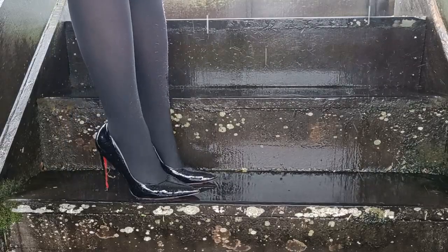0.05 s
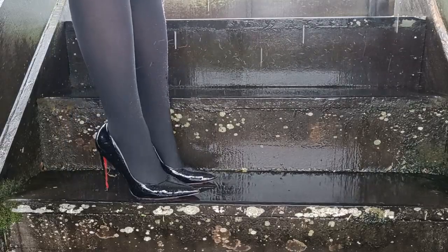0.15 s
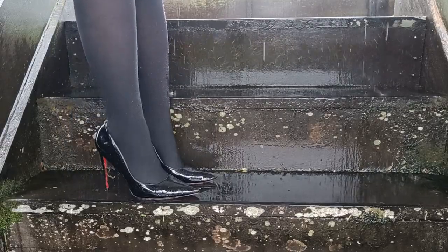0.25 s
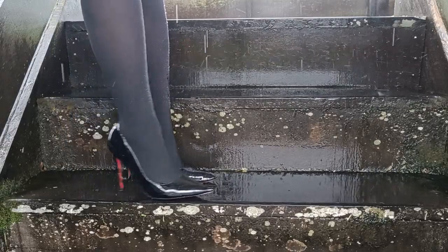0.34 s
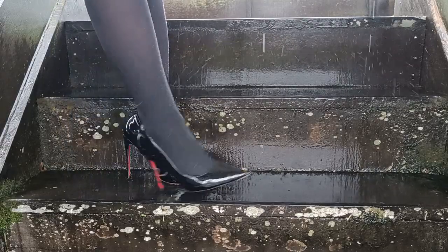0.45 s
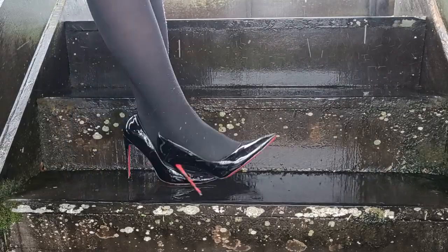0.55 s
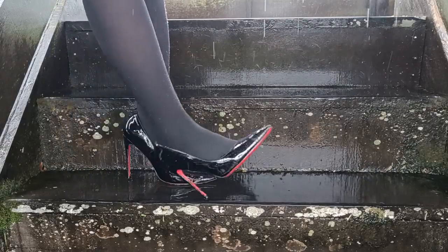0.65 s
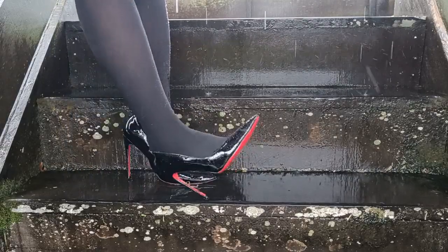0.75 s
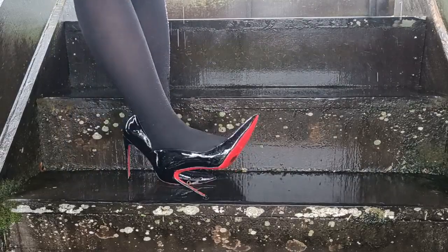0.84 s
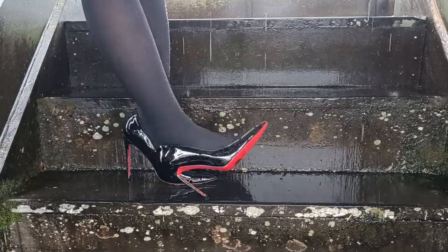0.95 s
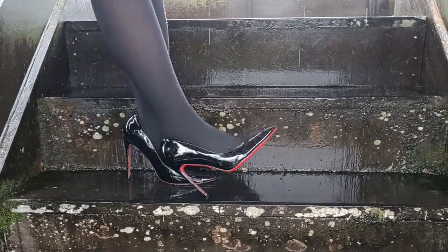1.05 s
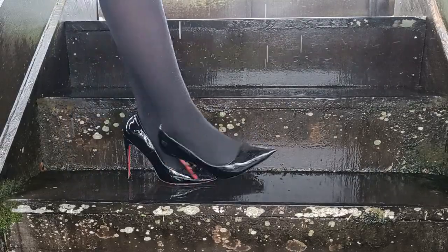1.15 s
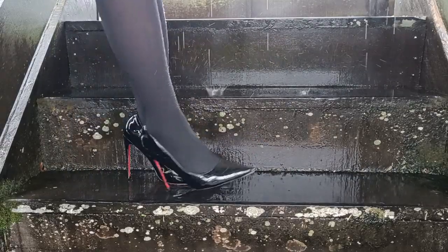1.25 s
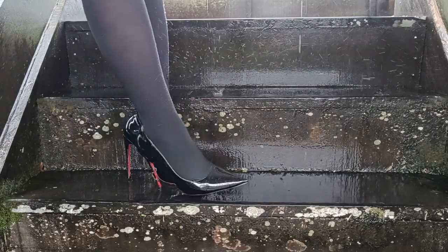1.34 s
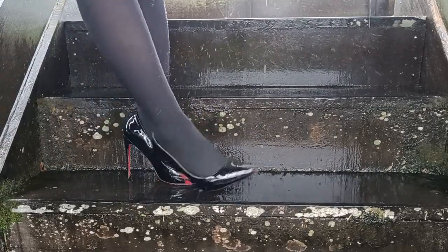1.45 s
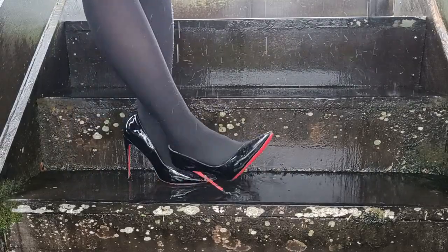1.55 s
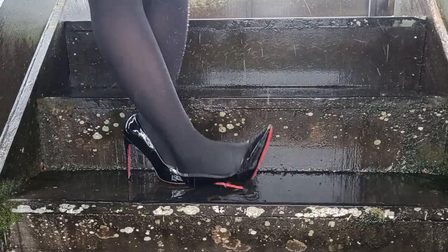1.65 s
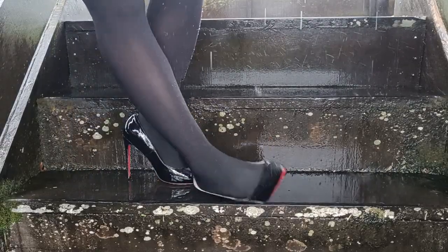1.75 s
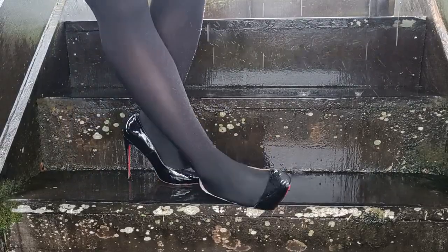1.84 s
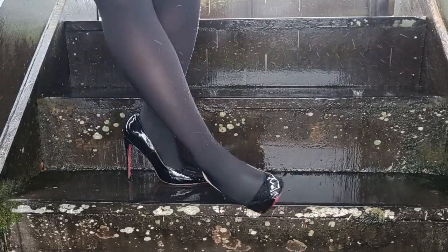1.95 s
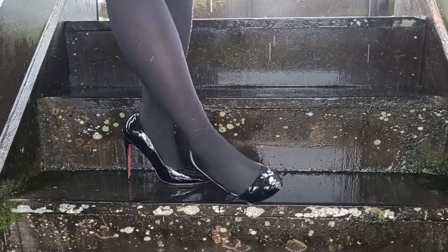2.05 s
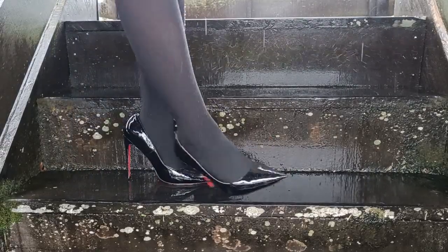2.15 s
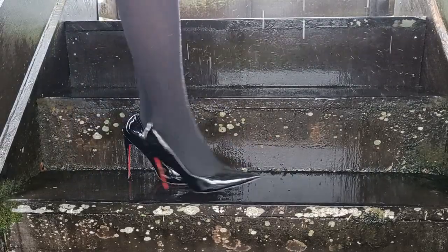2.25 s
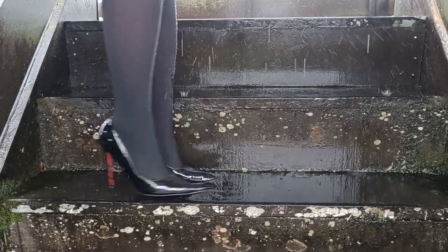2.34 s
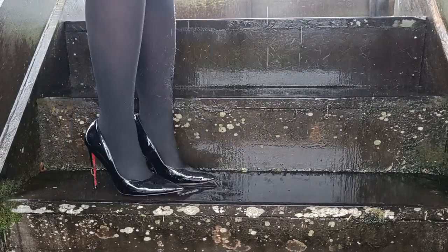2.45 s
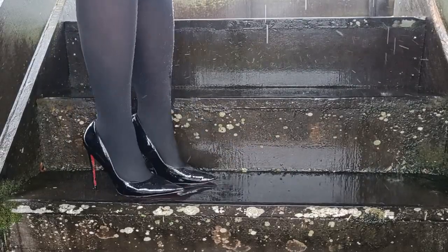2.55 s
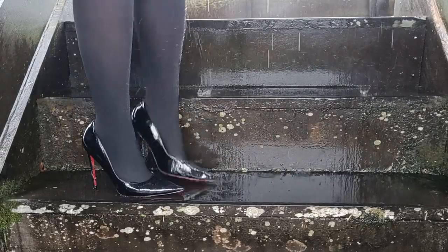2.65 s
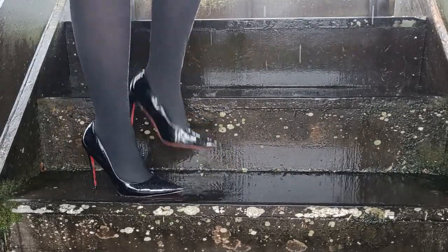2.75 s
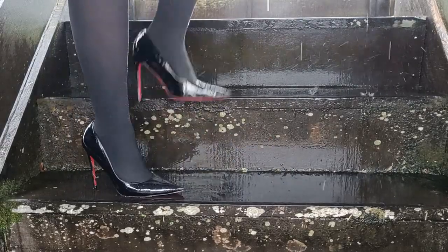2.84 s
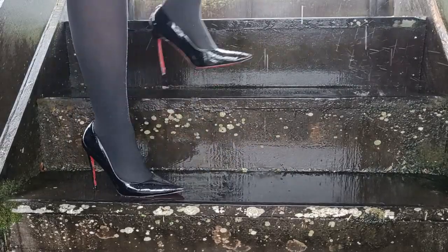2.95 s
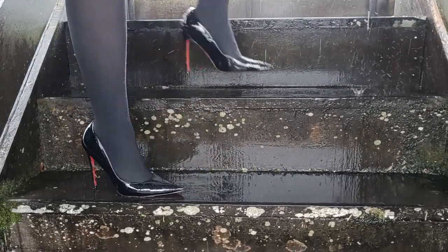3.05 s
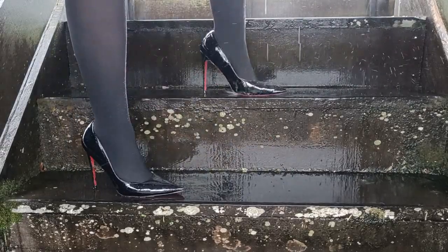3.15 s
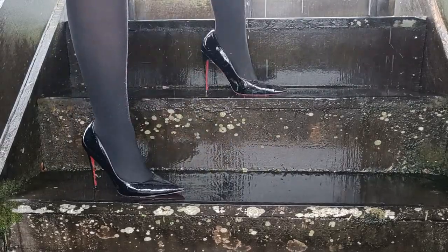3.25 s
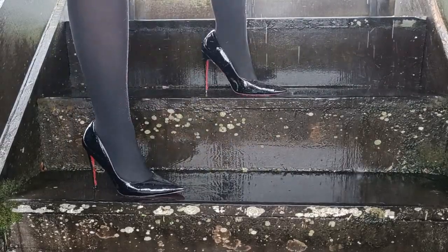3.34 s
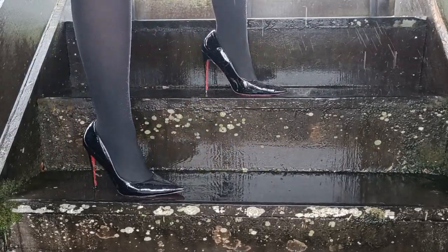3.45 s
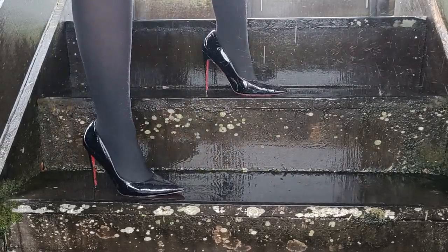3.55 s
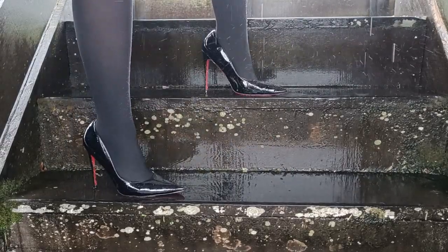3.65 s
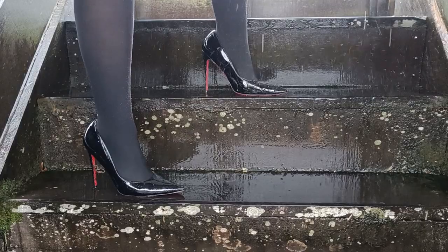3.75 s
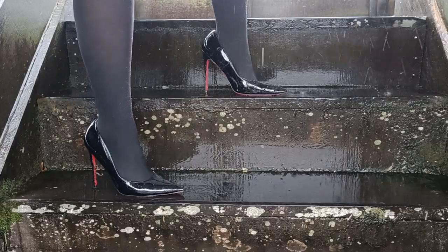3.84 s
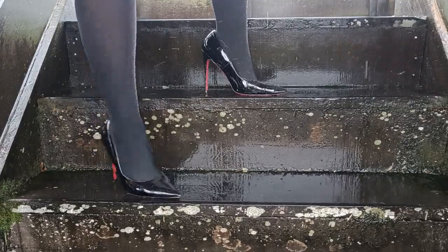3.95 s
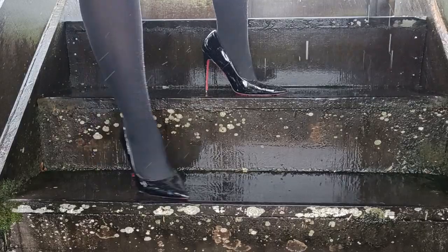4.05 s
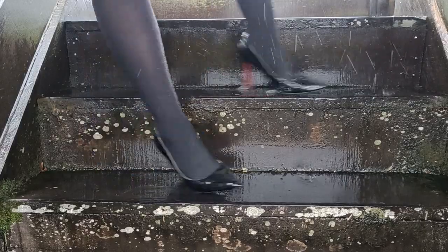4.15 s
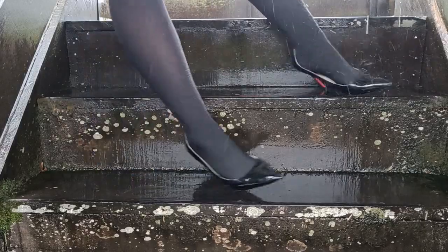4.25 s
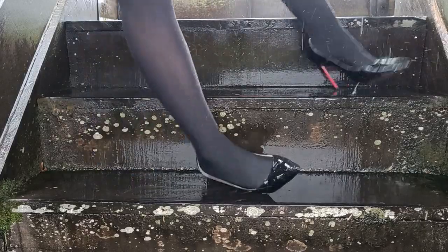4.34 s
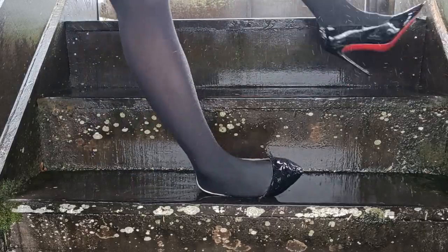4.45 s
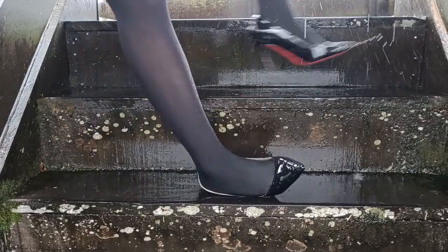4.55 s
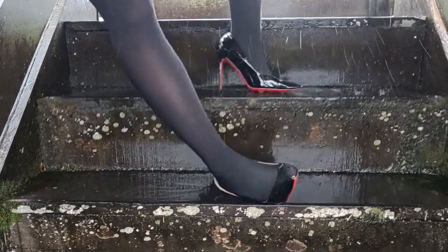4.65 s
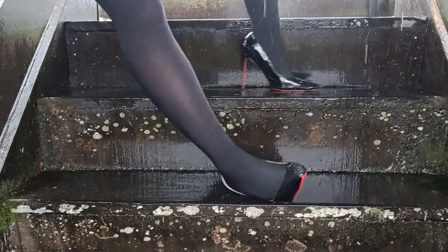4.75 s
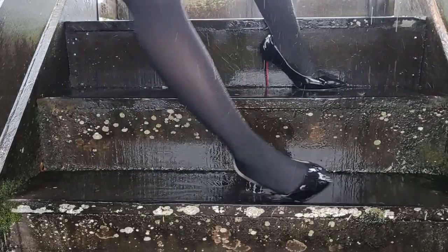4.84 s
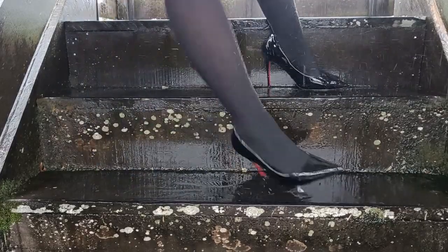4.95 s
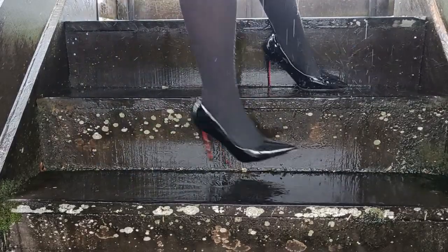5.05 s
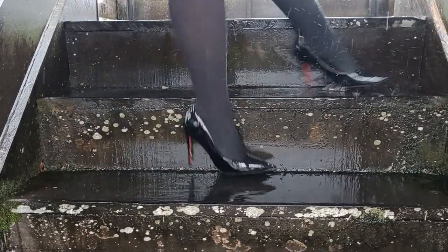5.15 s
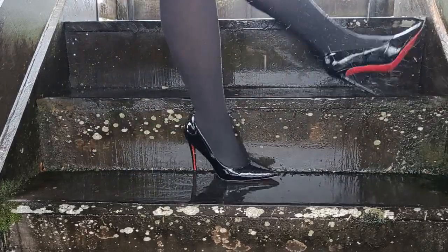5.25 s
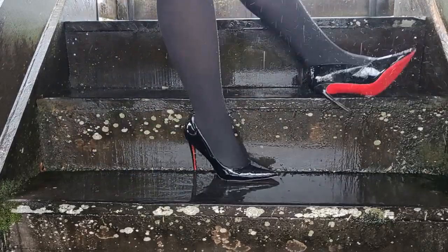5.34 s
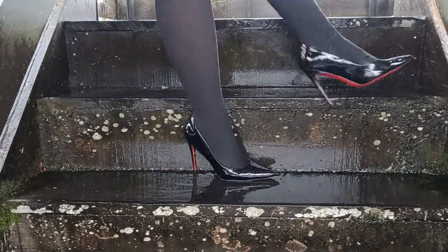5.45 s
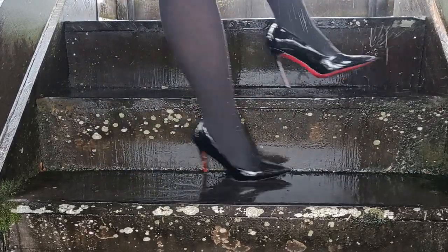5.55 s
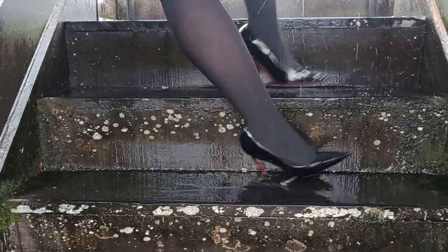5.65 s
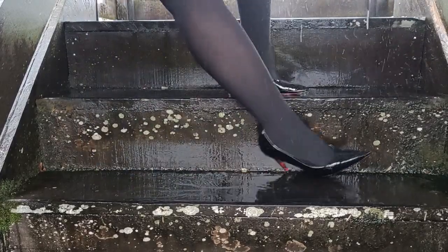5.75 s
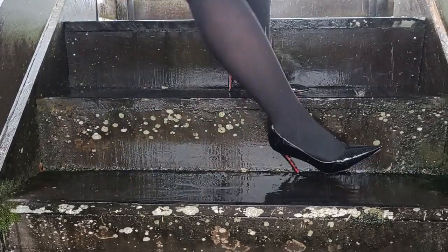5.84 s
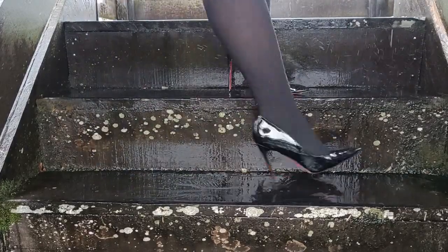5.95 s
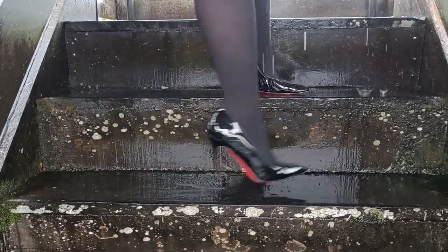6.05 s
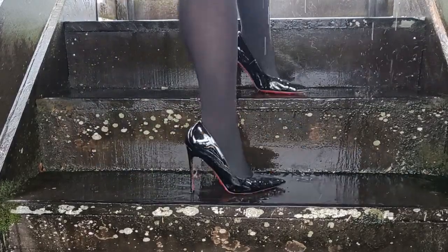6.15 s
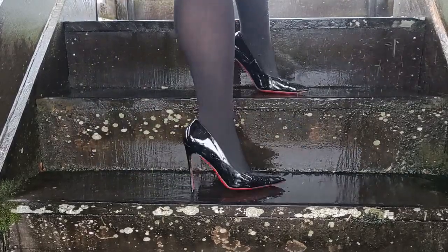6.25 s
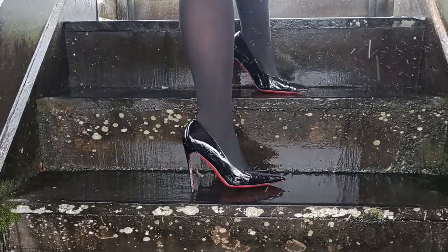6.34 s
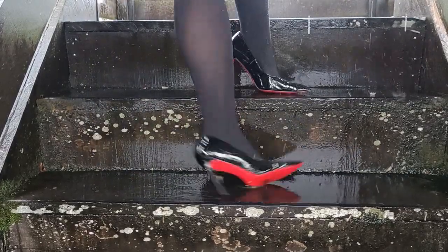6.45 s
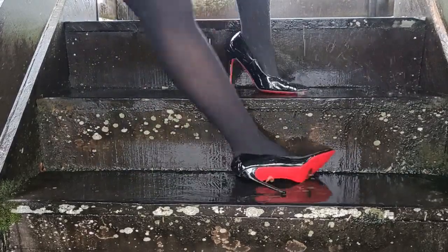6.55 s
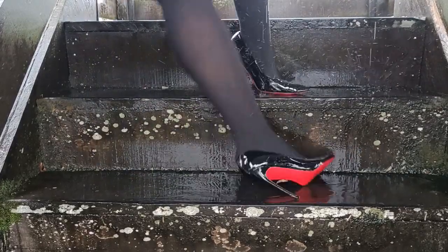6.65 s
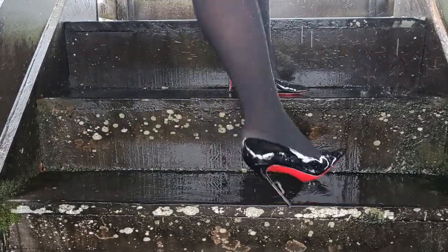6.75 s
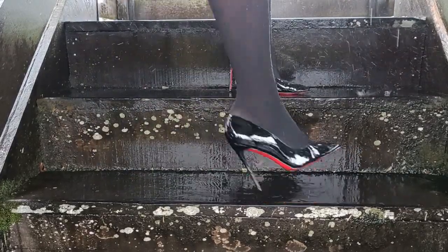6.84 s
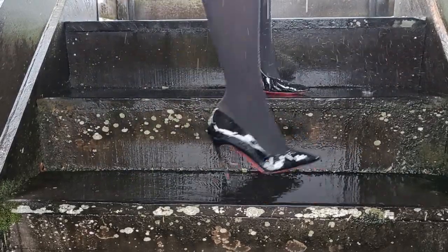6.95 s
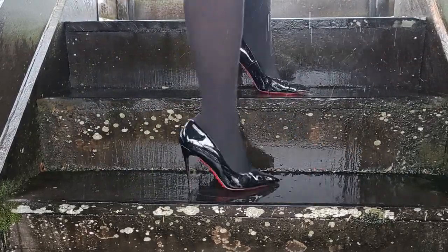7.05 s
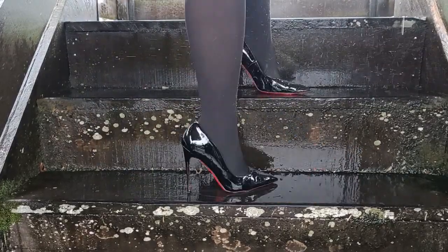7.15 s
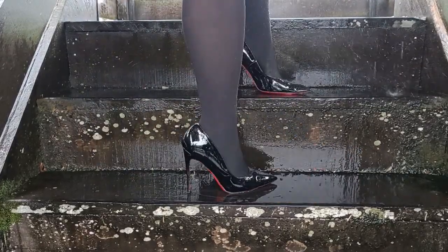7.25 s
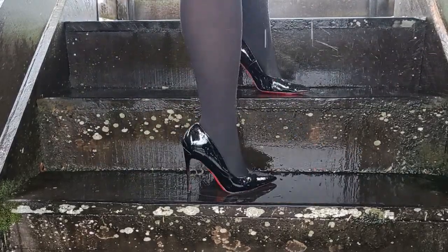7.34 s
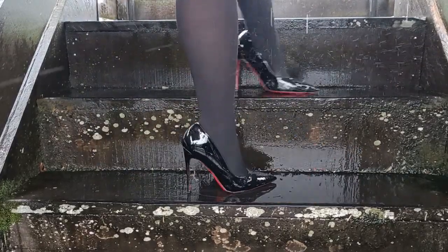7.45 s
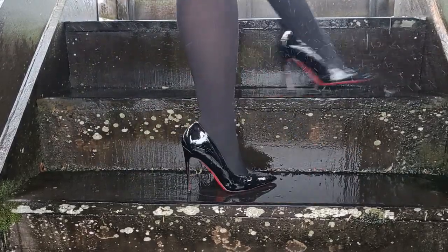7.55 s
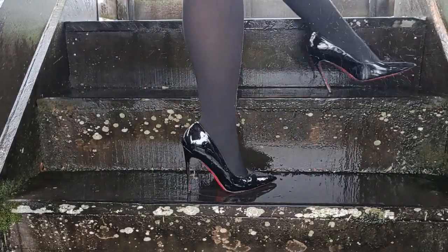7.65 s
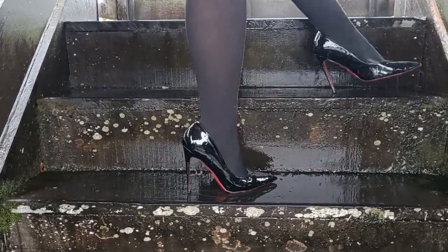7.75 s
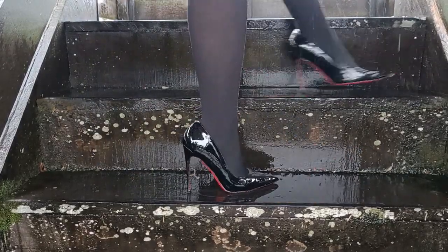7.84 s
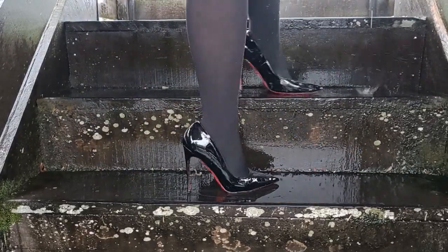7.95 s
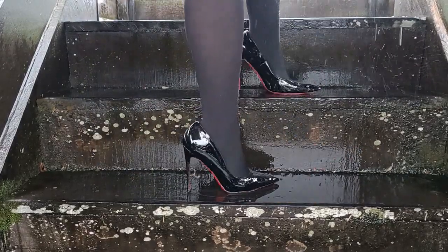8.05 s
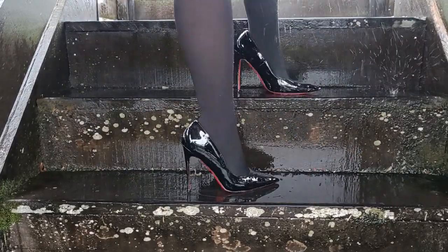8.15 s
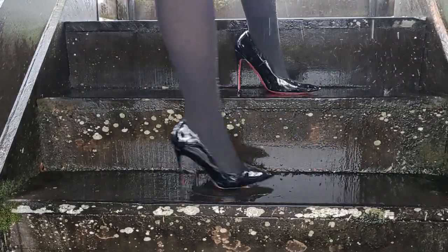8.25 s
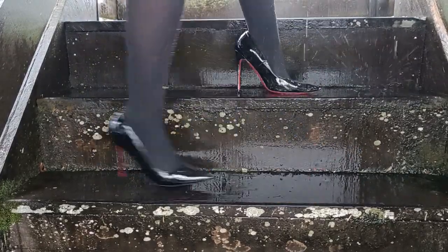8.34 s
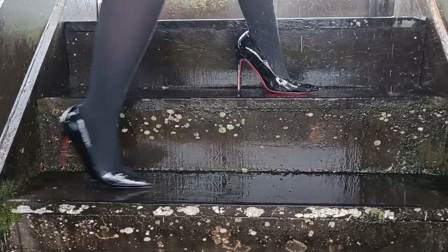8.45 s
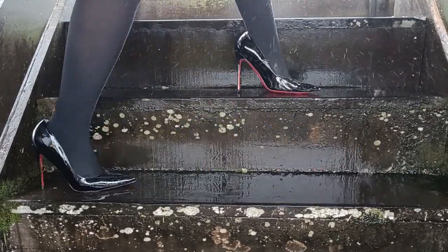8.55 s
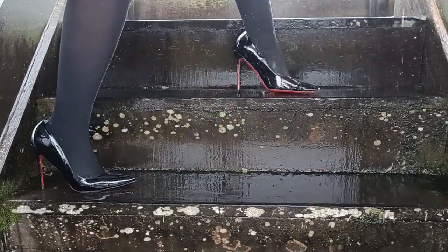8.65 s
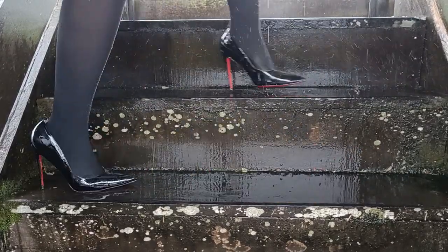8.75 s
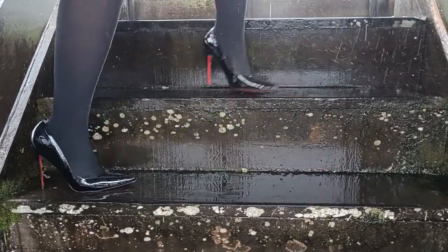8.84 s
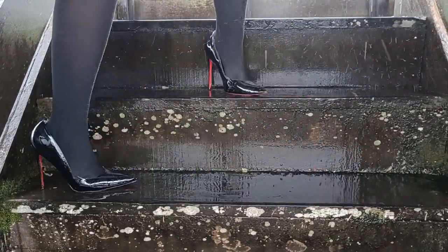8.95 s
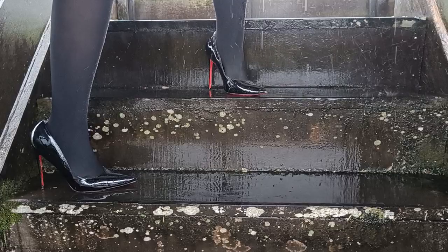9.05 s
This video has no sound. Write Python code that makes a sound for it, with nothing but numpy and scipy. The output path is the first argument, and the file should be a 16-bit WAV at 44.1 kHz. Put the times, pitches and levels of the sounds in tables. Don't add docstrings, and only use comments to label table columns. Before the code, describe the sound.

Steady rain roars and hisses while stiletto heels strike resonant wet stairs in irregular hard knocks, light taps, scrapes and splashes.

```python
import sys
import numpy as np
from scipy import signal
from scipy.fft import rfft, irfft
from scipy.io import wavfile
from scipy.ndimage import uniform_filter1d, minimum_filter1d

SR = 44100
rng = np.random.default_rng(int(sys.argv[2]) if len(sys.argv) > 2 else 0)


def wav_out(sig):
    wavfile.write(sys.argv[1], SR, np.round(np.clip(np.atleast_2d(sig).T, -1, 1) * 32767).astype(np.int16))


def voltage_ratio(decibels):
    exponent = np.asarray(decibels, float) / 20
    return 10 ** exponent


N = 401310

# f/Hz, level per Hz/dB
ROAR_COLOUR = [(70, -6), (250, -7), (460, -1), (700, -5.5), (1300, -3), (1900, -8.5), (3000, -21.5)]
HISS_COLOUR = [(2000, 1.5), (3000, 0.5), (5000, 3), (6500, -4.5), (8300, 5), (11000, -3.5), (12600, -3),
               (14000, -5.5), (15500, -3.5)]
# f/Hz, likeness (1 = same)
PORT_LIKENESS = [(60, 0.94), (250, 0.94), (450, 0.64), (650, 0.2), (1000, 0.), (16000, 0.0033)]
# f/Hz, Q, lift (below 0 a dip)
STAIR_HOLLOW = [(480, 15, 0.28), (1067, 4.5, -0.21), (1313, 7.8, 0.37), (1880, 5.0, 0.11)]
# t/s, level/dB
SHOWER_LEVEL = [
    (0, 0.8),
    (3.4, 0.3),
    (4.3, 0),
    (6.6, .5),
    (7.0, -.5),
    (9.1, -0.4),
]
# t/s, level/dB
WIND_GUSTS = [
    (1.59, -58),
    (1.9, -52),
    (2.15, -69),
    (3.7, -62),
    (4.54, -54.5),
    (5.0, -40),
    (5.5, -42),
    (5.75, -54.5),
    (6.05, -52),
    (6.8, -49),
]
# t/s, peak/dB, centre f/Hz
BIG_DROPS = [(0.5192, -49, 4310), (0.5661, -45, 8500), (1.016, -51, 8060), (1.1383, -46, 8550),
             (1.6746, -51, 4580), (1.718, -47, 5420), (2.0268, -45, 6930), (2.1455, -47, 4750),
             (2.5391, -48, 8200), (2.7737, -47, 8800), (3.101, -43, 7500), (4.3256, -43, 4830),
             (4.7386, -47, 8140), (5.6715, -47, 4930), (6.0821, -45, 7650), (6.569, -44, 4650),
             (7.8979, -42.5, 8300), (8.691, -44, 4860)]
# t/s, peak/dB, centre f/Hz, t60/s, fine spray relative level/dB
SHOE_SQUIRTS = [(1.419, -28, 5700, 0.11, -25.5), (3.3094, -36, 7450, 0.19, 7),
                (4.1115, -41, 5300, 0.28, -19), (4.7992, -10.5, 5600, 0.14, 3),
                (4.8167, -19.5, 4070, 0.12, -51), (5.3472, -30.5, 4570, 0.14, -16.5),
                (5.4485, -42, 5770, 0.077, -2), (5.4814, -40, 4670, 0.13, -16),
                (5.855, -26.5, 7800, 0.14, 10), (6.2682, -34.5, 4220, 0.2, -9),
                (6.2844, -46, 3900, 0.096, -48), (6.999, -30, 4880, 0.099, -19),
                (7.1916, -34.5, 4530, 0.088, -16.5), (8.0632, -37.5, 4200, 0.12, -21),
                (8.5357, -36, 7800, 0.098, 3), (8.6128, -41, 5560, 0.14, -15),
                (8.995, -29.5, 4800, 0.11, -14)]
# firmest contact t/s, rise/s, fall/s, level/dB, gritty edge relative level/dB
SOLE_SCUFFS = [
    (1.418, .05, 0.057, -41, -17),
    (1.6, 0.088, 0.36, -42.5, -3),
    (4.33, 0.092, 0.75, -43.5, 0),
    (5.34, 0.051, 0.043, -29.5, -5),
    (5.388, 0.03, 0.082, -28.5, 8),
    (5.486, 0.018, 0.086, -20.5, -42),
    (6.628, 0.066, 0.13, -47.5, 15),
    (7.59, 0.029, 0.11, -37, -10),
    (7.76, .2, 0.11, -40, -13),
    (8.68, 0.014, 0.059, -42.5, 4.5),
]
# f/Hz, width/Hz, level/dB
LOWER_TREAD_MODES = [(121, 35, 3.5), (198, 35.3, 4.5), (350, 70, 1.5), (521, 57, -0.5), (665, 164, -9),
                     (882, 44, 1.5), (1002, 16, 3.5), (1200, 330, -2), (1353, 470, -4.5), (2250, 2400, -12)]
UPPER_TREAD_MODES = [(128.4, 36.7, 8.5), (170.6, 48, 5), (296, 190, 3.5), (455, 66, -9.5), (637, 27, -41.5),
                     (775, 143, -0.5), (950, 263, 3.5), (1280, 89, 6), (1323, 137, 2.5), (2290, 420, -14.5)]
# delay/s, level/dB
WALL_ECHOES = [(.0065, 1), (.012, -2.5), (.018, -5.5), (.024, -6.5), (.031, -15.5), (.039, -15.5),
               (.048, -15)]
# from f/Hz, to f/Hz, t60/s, level/dB, port difference/dB
WALL_RETURNS = [(0, 230, 0.32, 2, 4), (230, 800, 0.23, -1.5, -1), (800, 1700, 0.2, -5.5, -11),
                (1700, 9000, 0.025, -13, 23)]
# t/s, peak/dB, low ring f/Hz, high ring f/Hz, thud relative level/dB
HEELS_ON_LOWER = [
    (2.564, -10, 400, 655, -17),
    (5.345, -3.5, 280, 560, -15.5),
    (6.283, -2.5, 514, 1030, -20),
    (6.622, -17, 510, 840, -31.5),
    (7.178, -12.5, 393, 1010, -14),
    (8.611, -3, 612, 700, -24),
]
HEELS_ON_UPPER = [
    (3.319, -3.5, 492, 870, -17.5),
    (4.797, 5, 455, 1154, -15),
    (5.862, -1, 480, 1125, -15),
    (9.006, -6, 504, 860, -19),
]
# t/s, peak/dB, low ring f/Hz, thud relative level/dB, edge relative level/dB
TAPS_ON_LOWER = [(1.418, -36, 460, 10, -9), (1.548, -34.5, 345, -11, -8), (1.84, -35, 310, -7, -23),
                 (4.398, -33.5, 463, -4, -13), (5.014, -22.5, 260, -8.5, -4), (5.249, -23.5, 340, -1, -2),
                 (5.387, -19, 610, -28, -16.5), (5.443, -21, 345, 11, 4), (5.481, -24, 237, -6, -42),
                 (6.567, -30.5, 437, -28, -4), (6.648, -23, 296, -18, -14), (6.679, -28.5, 527, -9, 0),
                 (6.822, -30.5, 396, -8, -1.5), (6.835, -39, 523, -25, -21), (7.188, -17.5, 415, -12, -8.5),
                 (8.071, -24, 434, -12, -22), (8.092, -23, 427, -12.5, -15)]
TAPS_ON_UPPER = [
    (4.23, -31.5, 380, -26, -30),
    (4.32, -24.5, 450, -28, -29),
    (4.354, -25.5, 504, -18, 2),
    (5.676, -26, 507, -15, -10),
    (7.574, -31.5, 365, -8, -18),
    (7.715, -40, 324, -22, -14),
]
# t/s, peak/dB, edge relative level/dB
TIP_GRAZES = [
    (2.536, -31.5, -9),
    (3.306, -25, -2),
    (5.852, -15, -0.5),
    (6.264, -24, -7),
    (6.612, -26, 1),
    (8.062, -32, -11),
    (8.988, -23.5, -5),
]


def in_time(rows):
    s, *columns = np.transpose(rows)
    return [np.interp(np.arange(N) / SR, s, c) for c in columns]


def at_hz(points, hz):
    table = np.array(points)
    return np.interp(np.log(hz), np.log(table[:, 0]), table[:, 1])


def rms_one(x):
    return x / np.sqrt(np.mean(x ** 2) + 1e-20)


def band(x, low_hz, high_hz):
    edges = [low_hz, min(high_hz, .45 * SR)]
    return signal.sosfilt(signal.butter(2, edges, "band", fs=SR, output="sos"), x)


def drift(rate):
    r = np.exp(-80 * np.pi * rate / SR)
    chance = rng.standard_normal(N // 40 + 2002)
    slow = signal.lfilter([1], [1, -2 * r, r * r], chance)[2000:]
    return np.interp(np.arange(N) / 40, np.arange(len(slow)), rms_one(slow))


def peak(s, db, rise_db_s, fall_db_s):
    t = np.arange(N) / SR - s
    return voltage_ratio(db + np.minimum(rise_db_s * t, -fall_db_s * t))


def add(out, sound, s):
    i = round(s * SR)
    out[:, i:i + sound.shape[1]] += sound[:, :N - i]


def patter(spectrum, low_hz, count, per_s, drop_db, spread_db, patchy_db):
    sizes = voltage_ratio(spread_db * np.minimum(rng.exponential(1, (2, 2, N)), 5))
    sizes = sizes * rng.choice([-1, 1], (2, 2, N))
    drops = rms_one(sizes * (rng.random(N) < per_s / SR))
    white = rng.standard_normal((2, 2, N)) + voltage_ratio(drop_db) * drops
    out = 0
    together = drift(5.7)
    for k in range(count):
        low = low_hz * 2 ** (k / 2)
        mid, side = band(white[k % 2], low, low * np.sqrt(2))
        alike = np.clip(at_hz(PORT_LIKENESS, low * 1.19), -1, 1)
        gain = voltage_ratio(at_hz(spectrum, low * 1.204) + patchy_db * (together + drift(3.9)))
        out = out + gain * (np.sqrt(1 + alike) * mid + np.sqrt(1 - alike) * side * [[1], [-1]])
    return out / np.sqrt(np.mean(out[1] ** 2))


def rain():
    shower_db, = in_time(SHOWER_LEVEL)
    roar = patter(ROAR_COLOUR, 66.6, count=11, per_s=150, drop_db=-9.5, spread_db=3.0, patchy_db=0.43)
    for hz, q, lift in STAIR_HOLLOW:
        roar = roar + lift * signal.lfilter(*signal.iirpeak(hz, q, SR), roar)
    hiss = patter(HISS_COLOUR, 2100, count=6, per_s=25, drop_db=-17, spread_db=4.0, patchy_db=.12)
    return voltage_ratio(-44.5 + shower_db) * roar + voltage_ratio(-54.5 + .3 * shower_db) * hiss


def droplets():
    sizes = voltage_ratio(3.0 * np.minimum(rng.exponential(1, N), 3))
    hits = (rng.random(N) < 9.0 / SR) * sizes
    puffs = signal.lfilter([1], [1, -.994], hits) * rng.standard_normal((2, N))
    return voltage_ratio(-52.5) * band(puffs, 10500, 16000)


def rumble():
    deep = rng.standard_normal((2, N)) + 1.3 * rng.standard_normal(N)
    calm_db, gust_db_s = -63.5, 102
    air = voltage_ratio(calm_db) + sum(peak(s, db, gust_db_s, gust_db_s) for s, db in WIND_GUSTS)
    lag_s, rise_db_s, fall_db_s = .04, 454, 130.5
    ground = 0
    for s, db, *_ in HEELS_ON_LOWER + HEELS_ON_UPPER:
        shudder_db = -29.5 + 1.5 * db
        ground = ground + peak(s + lag_s, shudder_db, rise_db_s, fall_db_s)
    wind = rms_one(band(band(deep, 25, 110), 13, 120))
    shudder = rms_one(band(band(deep, 17, 56), 6.7, 70))
    return air * wind + ground * shudder


def splashes():
    out = np.zeros((2, N))
    t = np.arange(round(.25 * SR)) / SR
    drop_t60_s, drop_spray_db = .08, -12
    bursts = SHOE_SQUIRTS + [(*drop, drop_t60_s, drop_spray_db) for drop in BIG_DROPS]
    noises = rng.standard_normal((len(bursts), 2, len(t)))
    for (s, db, hz, t60, spray_db), n in zip(bursts, noises):
        fade = voltage_ratio(-60 * t / 0.005) + 0.097 * voltage_ratio(-60 * t / t60)
        burst = (n + n[0]) * (1 - np.exp(-t / 0.00093)) * fade
        pitched = band(band(burst, hz / 1.2, hz * 1.2), hz / 1.2, hz * 1.2)
        spray = voltage_ratio(spray_db + 12) * band(burst, 6000, 16000)
        slap_db = -11 + 2.5 * max(db + 26, 0)
        fizz = pitched + spray + voltage_ratio(slap_db) * band(burst, 1900, 6600)
        add(out, voltage_ratio(db + 10) * fizz / np.abs(fizz).max(), s)
    return out


def scuffs():
    sizes = voltage_ratio(3.0 * np.minimum(rng.exponential(1, (2, N)), 3))
    grit = sizes * rng.choice([-1, 1], (2, N)) * (rng.random(N) < 400 / SR)
    grit = grit + grit[0]
    body = rms_one(band(grit, 256, 450) + 1.8 * band(grit, 108, 170))
    edge = rms_one(band(band(grit, 1130, 1880), 690, 2300) + 0.014 * band(grit, 3300, 15000))
    swing_db = 18.5
    out = 0
    for s, rise, fall, db, edge_db in SOLE_SCUFFS:
        gain = peak(s, db - 5.5, swing_db / rise, swing_db / fall)
        out = out + gain * (body + voltage_ratio(edge_db) * edge)
    return out


def resonance(f, hz, width):
    return 1j * f * width / (hz ** 2 - f ** 2 + 1j * f * width)


def knock(tread, low_hz, high_hz, thud_db, edge_db, noise):
    size = noise.shape[-1]
    t = np.arange(size) / SR
    f = np.arange(size // 2 + 1) * SR / size
    hz, width, db = np.transpose(tread)
    db = db + np.where(hz < 230, thud_db + 12.0, 0) + np.where(hz > 800, edge_db + 2.5, 0)
    signs = (-1) ** np.arange(len(hz))
    modes = (signs * voltage_ratio(db))[:, None] * resonance(f, hz[:, None], width[:, None])
    for ring_hz, share, lift in [(low_hz, .14, 2.2), (high_hz, .11, 1.1)]:
        modes = modes * (1 + lift * resonance(f, ring_hz, share * ring_hz))
    soft = 1j * f / (2650 * voltage_ratio(.15 * edge_db))
    modes = modes / (1 + .95 * soft + soft ** 2) ** 5
    ragged = noise[:2] * voltage_ratio(2.5 * rms_one(uniform_filter1d(noise[2], size=130)))
    apart = 1j * f / (1j * f + 700)
    contact = round(.002 * SR)
    sound = 0
    for low, high, t60, return_db, side_db in WALL_RETURNS:
        train = voltage_ratio(-25) * ragged * voltage_ratio(-60 * t / t60) * (1 - np.exp(-(t / 0.007) ** 2))
        for k, (lag, echo_db) in enumerate(WALL_ECHOES):
            at = contact + int(lag * SR * (1 + .02 * noise[0, k]))
            dull_db = 51 * (1 / 0.3 - 1 / t60) * lag
            ports = np.array([(-1) ** k, 0.21 * noise[2, k]])
            train[:, at] += voltage_ratio(echo_db + noise[1, k] + dull_db) * ports
        train = voltage_ratio(return_db) * train
        train[0, contact] = 1
        in_range = (hz >= low) & (hz < high)
        mid, side = rfft(train) * modes[in_range].sum(axis=0)
        sound = sound + mid + voltage_ratio(side_db) * side * apart * [[1], [-1]]
    push_hz, push_q, push_db = 560, 1.18, -5.5
    push = -(push_hz * 1j * f / (push_hz ** 2 - f ** 2 + 1j * f * push_hz / push_q)) ** 2
    push = push / (1 + 1.25 * soft + soft ** 2) ** 5
    sound = irfft(sound + voltage_ratio(push_db) * push * np.exp(-2j * np.pi * f * contact / SR))
    return sound / np.abs(sound.mean(axis=0)).max()


def knocks():
    blows = []
    for tread, heels, taps, tap_high_hz in [
            (LOWER_TREAD_MODES, HEELS_ON_LOWER, TAPS_ON_LOWER, 1055),
            (UPPER_TREAD_MODES, HEELS_ON_UPPER, TAPS_ON_UPPER, 1380)]:
        for s, db, low, high, thud in heels:
            edge = -20 - 0.58 * thud
            blows.append((s, db, tread, low, high, thud, edge))
        for s, db, low, thud, edge in taps:
            blows.append((s, db, tread, low, tap_high_hz, thud, edge))
    for s, db, edge in TIP_GRAZES:
        blows.append((s, db, LOWER_TREAD_MODES, 438, 1150, -10, edge))
    out = np.zeros((2, N))
    noises = rng.standard_normal((len(blows), 3, 2 ** 14))
    for (s, db, *timbre), noise in zip(blows, noises):
        add(out, voltage_ratio(db) * knock(*timbre, noise), s)
    return out


def scene():
    return rain() + droplets() + rumble() + splashes() + scuffs() + knocks()


def wet_port(sound):
    w, q = 2 * np.pi * 1388, 1.84
    sound = signal.lfilter(*signal.bilinear([w * w], [1, w / q, w * w], SR), sound)
    sound = signal.sosfilt(signal.butter(2, 5540, fs=SR, output="sos"), sound)
    return sound + voltage_ratio(-115.0) * rng.standard_normal(N)


def open_port(sound):
    sound = np.roll(sound, 2)
    notch = signal.iirnotch(10160, 2.18, SR)
    for _ in range(2):
        sound = 0.26 * sound + 0.75 * signal.lfilter(*notch, sound)
    return sound + 2.14 * signal.lfilter(*signal.iirpeak(8550, 6.0, SR), sound)


def limiter(x):
    limit, release_db_s = 0.84, 176
    fall = release_db_s * np.arange(N) / SR
    over = np.maximum(20 * np.log10(np.abs(x).max(axis=0) / limit + 1e-9), 0)
    held = np.maximum.accumulate(over + fall) - fall
    ahead = -minimum_filter1d(-held, size=65)
    return x * voltage_ratio(-uniform_filter1d(ahead, size=33))


def low_pass(x):
    return signal.sosfilt(signal.butter(12, 16970, fs=SR, output="sos"), x)


def record(dry):
    ports = [wet_port(dry[0]), open_port(dry[1])]
    x = signal.sosfilt(signal.ellip(12, .5, 30, 15760, fs=SR, output="sos"), ports)
    return low_pass(limiter(x))


dry = scene()
out = record(dry)
wav_out(out)
```